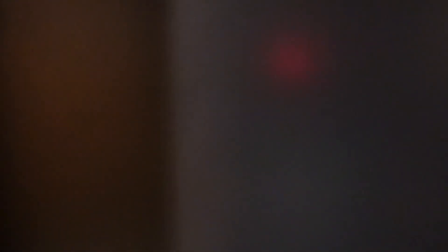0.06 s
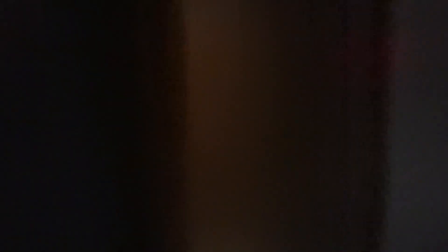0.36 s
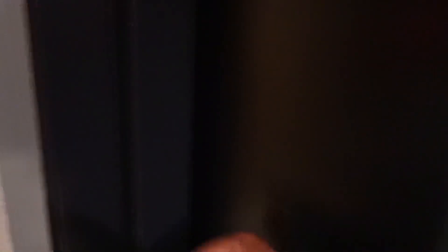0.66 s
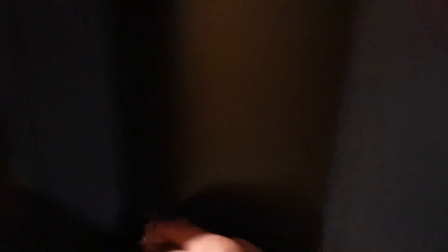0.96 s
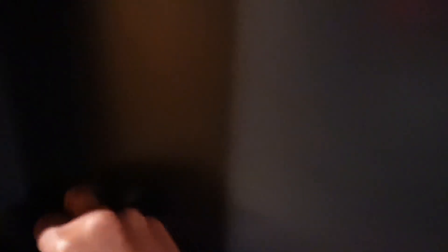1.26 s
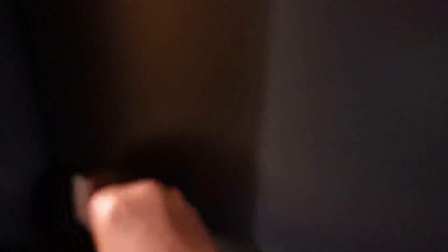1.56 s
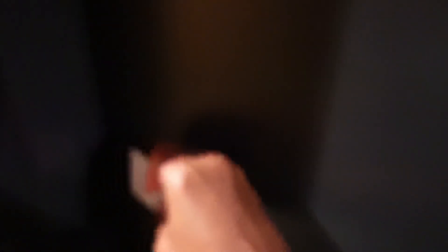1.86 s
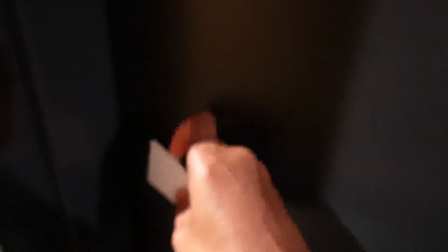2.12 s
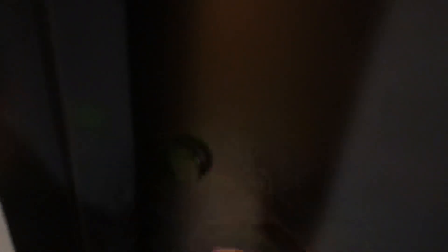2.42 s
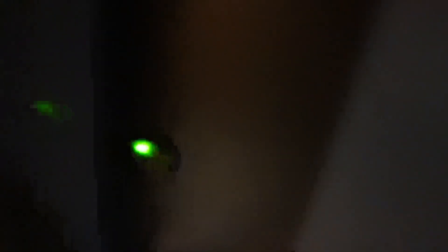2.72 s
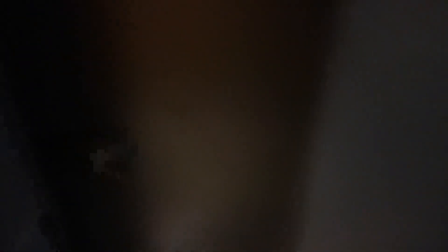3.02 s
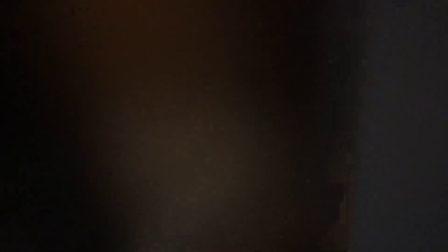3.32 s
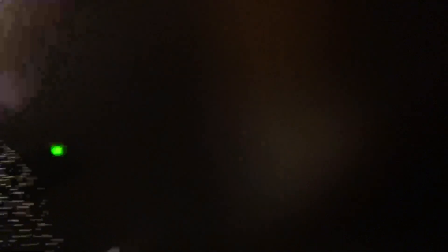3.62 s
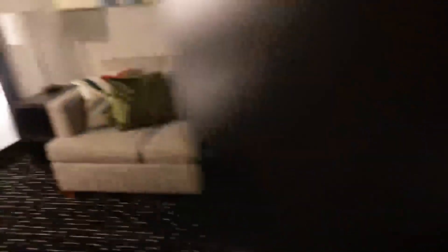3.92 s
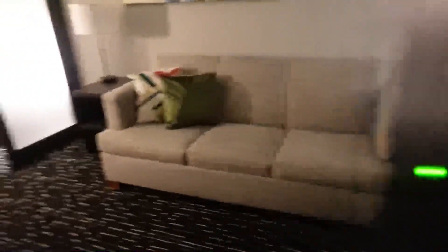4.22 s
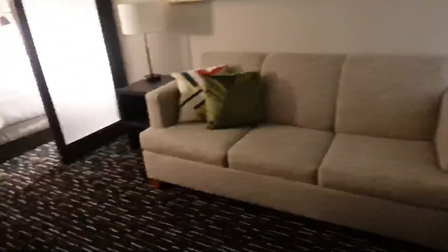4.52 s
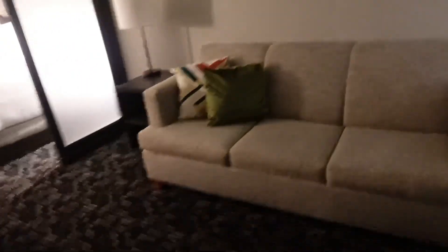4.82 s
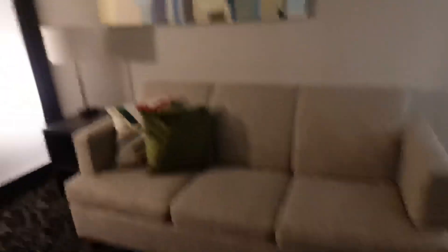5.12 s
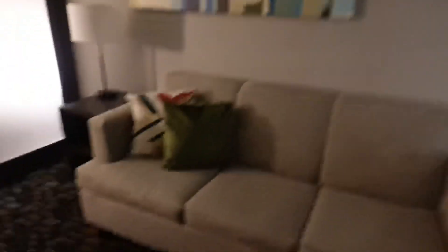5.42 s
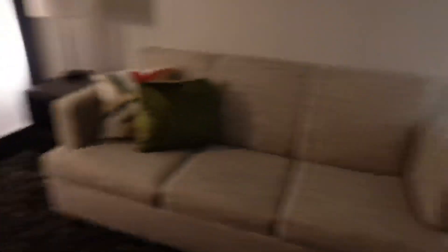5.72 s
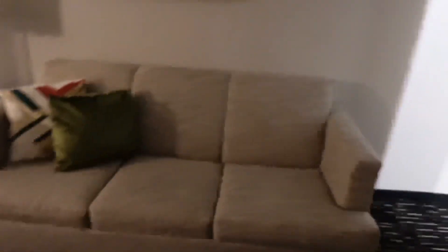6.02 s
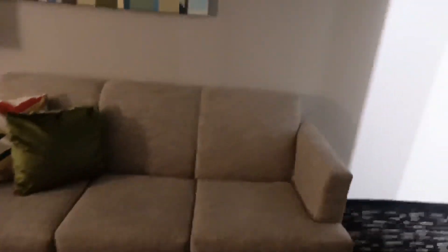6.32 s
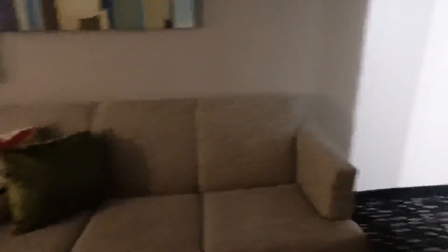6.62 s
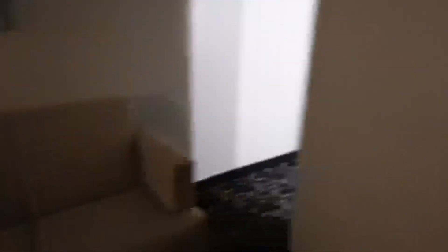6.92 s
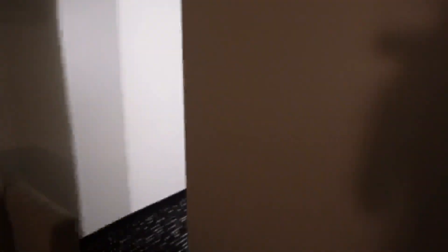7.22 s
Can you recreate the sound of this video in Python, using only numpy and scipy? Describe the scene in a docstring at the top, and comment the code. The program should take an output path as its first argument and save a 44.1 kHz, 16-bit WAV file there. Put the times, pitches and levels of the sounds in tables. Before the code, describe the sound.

Low puffs of wind hit the microphone, followed by close, light clicks and a tiny squeak from a plastic key card. A door handle turns with metallic clacks and a sharp latch snap, and the door sweeps open, fanning rumbling air across the microphone. Faint clothing rustle and ventilation hiss fill a carpeted room as the door knocks closed off to the right and clicks.

```python
"""Someone with a handheld camera opens a key-card door and walks into a carpeted room.
Air buffets the microphone in a quiet corridor. The plastic card clicks and squeaks in the fingers,
then knocks into the lock. The handle grinds round, the latch snaps and the door sweeps over the carpet,
fanning more gusts. Clothes swish as the room's ventilation comes up; behind the walker the door bumps
its frame and the latch drops in."""
import sys
import numpy as np
from scipy import signal
from scipy.fft import rfft, irfft, next_fast_len
from scipy.io import wavfile
from scipy.ndimage import uniform_filter1d

SR = 44100
rng = np.random.default_rng(int(sys.argv[2]) if len(sys.argv) > 2 else 0)


def wrap_up_sound(samples):
    """Save the sound to the file named by the first command line argument, as 16-bit audio."""
    columns = np.atleast_2d(samples).T
    # keep every value between -1 and 1, then stretch to whole-number steps
    tamed = np.clip(columns, -1, 1)
    steps = np.round(tamed * 32767).astype(np.int16)
    wavfile.write(sys.argv[1], SR, steps)


N = 329239
TIME = np.arange(N) / SR

# The room's air comes up as the walker steps in. Each row: time in seconds, level in dB.
ROOM_AIR_FADE = [(0, -66.5), (2.5, -75.5), (3.5, -60), (4.6, -65), (5.0, -58), (5.3, -53.5), (5.7, -51.5),
                 (6.5, -55), (7.47, -54)]


def gain_of(db):
    """Decibels to amplitude."""
    return 10 ** (np.asarray(db) / 20)


def evened(x):
    """Scales to rms 1."""
    return x / np.sqrt(np.mean(x ** 2) + 1e-20)


def read(points, hz):
    """Reads a table on a log-frequency axis."""
    f, value = np.transpose(points)
    return np.interp(np.log(hz + 1), np.log(f + 1), value)


def follow(curve):
    """A fader ride through rows of seconds and dB, silent outside them."""
    s, db = np.transpose(curve)
    return gain_of(np.interp(TIME, s, db, left=-120, right=-120))


def add(mix, s, sound):
    """Mixes a sound in at s seconds."""
    part = mix[..., max(round(s * SR), 0):][..., :sound.shape[-1]]
    part += sound[..., :part.shape[-1]]


def freqs(size):
    """Frequencies of the FFT bins."""
    return np.fft.rfftfreq(size, 1 / SR)


def dying(t, t60):
    """Decay by 60 dB in t60 seconds, 1 ms at the shortest."""
    return np.exp(-np.log(1000) * t / np.maximum(t60, 1e-3))


def coloured(x, spectrum):
    """An EQ drawn through rows of Hz and dB."""
    size = next_fast_len(x.shape[-1])
    return irfft(rfft(x, size) * gain_of(read(spectrum, freqs(size))), size)[..., :x.shape[-1]]


def causal(db):
    """Minimum-phase response with the given gain."""
    log_gain = np.log(gain_of(np.r_[db, db[-2:0:-1]]))
    return np.exp(np.conj(signal.hilbert(log_gain)))[:len(db)]


def panned(pan_db):
    """Gains of the microphone's two ports; pan is left minus right."""
    return gain_of(pan_db * np.array([[.5], [-.5]]))


def diffuse(pair):
    """Spreads a mid and a side signal as wide as diffuse sound is at the two ports."""
    # Each row: frequency in Hz, likeness of left and right from 0 to 1.
    likeness = [(100, 0.95), (500, 0.75), (1500, 0.44), (5000, 0.53), (14000, 1)]
    size = next_fast_len(pair.shape[-1])
    mid, side = rfft(pair, size)
    same = np.clip(read(likeness, freqs(size)), 0, 1)
    mid, side = mid * np.sqrt((1 + same) / 2), side * np.sqrt((1 - same) / 2)
    return irfft(np.array([mid + side, mid - side]), size)[:, :pair.shape[-1]]


def at_ports(x, spread_db, size=220):
    """Hand and door reflect a close sound slightly differently into each port."""
    scatter = rng.standard_normal(size) * np.hanning(size)
    side = gain_of(spread_db) * signal.oaconvolve(x, scatter / np.linalg.norm(scatter))[:N]
    return np.array([x + side, x - side])


def reverb(x, size=32768):
    """The room's diffuse tail, each band dying at its own speed."""
    # Each row: frequency in Hz, t60 in seconds.
    decay_times = [(100, 0.93), (300, 0.45), (1000, 0.43), (3000, 0.47), (7000, 0.5), (15000, 0.36)]
    hz, t, bands = signal.stft(rng.standard_normal((2, size)), SR, nperseg=256)
    swell = 1 - np.exp(-(t / 0.0021) ** 2)
    decay = dying(t, read(decay_times, hz)[:, None])
    tail = diffuse(signal.istft(bands * swell * decay, SR, nperseg=256)[1])
    return signal.oaconvolve(x[None], tail / np.linalg.norm(tail[0]), axes=1)[:, :N]


def air(spectrum, waver_db=0):
    """A wide noise bed whose level can waver in patches of frequency and time."""
    noise = coloured(diffuse(rng.standard_normal((2, N))), spectrum)
    bands = signal.stft(noise, SR, nperseg=512)[2]
    patches = uniform_filter1d(rng.standard_normal(bands.shape[1:]), 9, axis=0)
    patches = evened(uniform_filter1d(patches, 14, axis=1))
    return evened(signal.istft(bands * gain_of(waver_db * patches), SR, nperseg=512)[1][:, :N])


def corridor_air():
    """Quiet ventilation and a low drone that fades as the walker stops."""
    # Each row: frequency in Hz, relative level in dB.
    vent_eq = [(18, -63.5), (30, -45), (124, 4), (844, -13), (962, -11.5), (1070, -15), (3310, -18.5),
               (4190, -13.5), (4530, -26), (5040, -8.5), (5590, -14), (8980, -29), (9710, -25),
               (12600, -21), (16000, -35.5)]
    drone_eq = [(100, -29.5), (190, -5.5), (255, 3.5), (330, -16), (600, -66)]
    # Each row: time in seconds, level in dB.
    drone_fade = [(0.4, -43), (0.7, -55), (1.05, -56), (1.7, -74)]
    return gain_of(-69.5) * air(vent_eq) + follow(drone_fade) * air(drone_eq, waver_db=5)


def room_air():
    """The room's louder ventilation, with a thin whine on top."""
    # Each row: frequency in Hz, relative level in dB.
    vent_eq = [(18, -54), (30, -22), (87, -12), (145, 1), (203, -0.5), (257, -5), (503, -13.5),
               (668, -16.5), (1180, -15), (1490, -18.5), (2370, -19.5), (5150, -26.5), (6500, -26),
               (14500, -37.5)]
    whine_eq = [(13000, -41.5), (15000, -14), (15500, -15), (15900, 2), (16400, -25)]
    bed = air(vent_eq, waver_db=1.43) + gain_of(-17) * air(whine_eq, waver_db=-1)
    return follow(ROOM_AIR_FADE) * bed


def fine_hiss(attack_s=0.07, release_t60=0.68):
    """Air hisses in swells, strongest as the door swings; a trace stays on in the room."""
    # Each row: frequency in Hz, relative level in dB.
    hiss_eq = [(3000, -13.5), (4500, -7), (5400, 0.5), (6800, -7.5), (9000, -5.5), (11000, -3.5),
               (14000, 0.5), (16000, -2)]
    # Each row: start in seconds, length in seconds, level in dB.
    cues = [(-0.05, 0.35, -65.5), (1.6, 0.13, -74), (3.851, 0.28, -55.5), (4.365, 0.46, -60)]
    swells = np.zeros(N)
    for s, length, db in cues:
        attack = np.clip((TIME - s) / attack_s, 0, 1) ** 2
        swells += gain_of(db) * attack * dying(np.maximum(TIME - s - length, 0), release_t60)
    fade_in = np.clip(TIME - cues[-1][0], 0, 1)  # from the last swell on
    steady = gain_of(-15) * follow(ROOM_AIR_FADE) * fade_in
    return np.hypot(swells, steady) * air(hiss_eq)


def eddy(s, peak_db, hz, pan_db, half_width_cycles=0.58):
    """One eddy pops on the microphone, out of step between the ports. Returns start and sound."""
    t, turn = np.arange(-SR // 50, SR // 50) / SR, rng.random(2)
    cycles = hz * t + turn[0] + 0.19 * np.array([[0], [1]]) * turn[1]
    puff = np.cos(2 * np.pi * cycles) / (1 + (t * hz / half_width_cycles) ** 2) ** 2
    return s + t[0], gain_of(peak_db) * panned(pan_db) * puff


def wind(flutter_db=1.1, eddies_per_s=21):
    """Turbulence as the camera swings and the door fans the air, reaching higher as it grows."""
    # Each row: peak time in seconds, relative level in dB, time to build by 60 dB in seconds
    # (negative for a hard onset), t60 in seconds, pan in dB.
    gusts = [(0.0, -33, .1, 0.2, -1), (0.189, -28.5, 0.1, 0.079, 13.5), (0.246, -23, 0.23, 0.2, 2),
             (0.281, -23, 0.12, 0.32, -7), (0.383, -26.5, 0.4, 0.42, -0.5), (0.8, -49.5, -0.34, 0.24, 3),
             (1.29, -66, 4.5, 0.39, -1), (2.15, -59.5, 0.4, .7, 0), (3.836, -35, 0.55, 0.49, -11.5),
             (3.92, -43, -0.2, 0.66, 11), (4.033, -37, 1.1, 0.4, 2), (4.344, -20, 0.16, 0.071, 4),
             (4.45, -24, 0.71, 0.057, -0.5), (4.575, -42, 0.5, 0.29, 4.5), (4.744, -44, 0.3, 0.27, -2),
             (4.835, -43, 0.2, 0.13, -3.5), (4.877, -40.5, -1.65, 0.071, -5), (5.049, -48, 0.2, 0.51, 14)]
    # Gentle and strong flow. Each row: frequency in Hz, relative level in dB.
    breeze_eq = [(20, -30.5), (50, -23), (95, 7.5), (150, 4), (240, -3.5), (350, -19.5), (500, -35.5),
                 (800, -57), (1500, -56.5), (4000, -67)]
    gust_eq = [(20, -47), (50, -23), (95, -16.5), (150, 3), (270, 6.5), (380, -11.5), (550, -15),
               (800, -34), (1500, -69), (4000, -56.5)]
    # Each row: time in seconds, peak in dB, pitch in Hz, pan in dB.
    hard_eddies = [(0.243, -18, 305, -16), (0.346, -20.5, 264, -22.5), (0.378, -12, 242, -9),
                   (3.712, -36, 166, -11), (3.768, -32, 251, -15), (3.835, -21, 238, -12),
                   (3.924, -22, 193, -2), (4.028, -21, 146, 5), (4.248, -24, 144, -9.5),
                   (4.289, -17, 243, -2), (4.337, -15.5, 127, -8), (4.349, -12.5, 222, 1),
                   (4.424, -21, 335, -4), (4.446, -16.5, 250, 10)]
    power = np.zeros((2, N))
    for s, db, build, fall, pan_db in gusts:
        swell = dying(abs(TIME - s), np.where(TIME < s, build, fall))
        power += (gain_of(db) * panned(pan_db) * swell) ** 2
    envelope = np.sqrt(power)
    level = envelope.mean(0) + 1e-9
    strength = level / (level + gain_of(-32.5))
    noise = rng.standard_normal((2, N))
    noise = noise + 0.91 * (1 - strength) ** 4 * noise[::-1]  # gentle air is nearly mono
    flow = (1 - strength) * evened(coloured(noise, breeze_eq))
    flow += strength * evened(coloured(noise, gust_eq))
    flow /= np.sqrt(uniform_filter1d(flow ** 2, 1100, axis=1) + 1e-4)  # ride the level flat
    flutter = gain_of(flutter_db * evened(uniform_filter1d(rng.standard_normal(N), 900)))
    out = gain_of(-2) * envelope * flow * flutter
    for row in hard_eddies:
        add(out, *eddy(*row))
    for at in np.flatnonzero(rng.random(N) < eddies_per_s / SR):  # lesser eddies ride the gusts
        peak_db = 20 * np.log10(level[at]) + 4
        hz = 263 * 2 ** (0.02 * (peak_db + 21))  # stronger ones turn faster
        add(out, *eddy(at / SR, peak_db, hz, pan_db=11 * rng.uniform(-0.91, 1)))
    return out


def friction(strokes, rise, octaves, skirt, grain_db, size=32768):
    """Grainy noise strokes that swell, then die. Rise is a share of t60; skirt steepens the band."""
    t, hz, out = np.arange(size) / SR, freqs(size), np.zeros((2, N))
    for s, level_db, t60, centre_hz in strokes:
        noise = rng.standard_normal((3, size))
        rise_s = rise * t60
        late = t - min(3 * rise_s, s)
        swell = np.where(late < 0, np.exp(-(late / rise_s) ** 2), dying(np.maximum(late, 0), t60))
        grains = gain_of(grain_db * evened(uniform_filter1d(noise[2], 90)))
        band = 1 / (1 + (np.log2((hz + 1) / centre_hz) / octaves) ** 2) ** skirt
        band /= 1 + (90 / (hz + 1)) ** 2  # low cut
        mid, side = evened(irfft(rfft(noise[:2] * grains) * band))
        add(out, s + late[0], gain_of(level_db) * swell * (mid + 0.23 * np.array([side, -side])))
    return out


def clothes_swish(centre_hz=2450):
    """Cloth brushes cloth with the steps."""
    # Each row: peak time in seconds, level in dB, t60 in seconds.
    swishes = [(4.739, -62, 0.25), (4.856, -55, 0.45), (5.039, -56.5, 0.11), (5.139, -55.5, 0.35),
               (6.084, -53.5, .1), (6.249, -52.5, 0.26), (6.987, -51.5, 0.39)]
    strokes = [(*row, centre_hz) for row in swishes]
    return friction(strokes, rise=0.11, octaves=1.7, skirt=1.24, grain_db=2.5)


def grip_rustle():
    """Fingers shift on the camera."""
    # Each row: peak time in seconds, level in dB, t60 in seconds, band centre in Hz.
    strokes = [(0.01, -58.5, 0.3, 885), (0.179, -48, .11, 1180), (0.226, -43, 0.13, 1120),
               (0.242, -48, .045, 6000), (0.377, -61, 0.052, 1390), (4.982, -55, 0.051, 4970),
               (6.532, -58, .06, 2480)]
    return friction(strokes, rise=0.059, octaves=1.18, skirt=1.16, grain_db=4)


def card_slide():
    """The card slides on skin and along the lock."""
    # Each row: peak time in seconds, level in dB, t60 in seconds, band centre in Hz.
    strokes = [(0.793, -48, 0.27, 3040), (0.923, -38, 0.15, 3070), (1.004, -41, 0.24, 2600),
               (1.049, -47, 0.093, 1890), (1.186, -50, .22, 3270), (1.299, -53, .35, 1140),
               (1.449, -56, .4, 1030), (2.072, -57, 0.31, 3660), (2.356, -54.5, 0.37, 2360)]
    return friction(strokes, rise=0.092, octaves=0.94, skirt=1.3, grain_db=3.5)


def handle_grind(panel_s=2.665, panel_db=-41.5, panel_t60=1, panel_hz=118):
    """The pressed handle grinds on its spindle and the door panel rumbles under it."""
    # Each row: peak time in seconds, level in dB, t60 in seconds, band centre in Hz.
    strokes = [(2.664, -42, 0.2, 744), (2.713, -40, 0.26, 740), (2.832, -42.5, 0.12, 1190),
               (2.849, -34, .09, 310), (2.946, -52.5, .18, 935)]
    spindle = friction(strokes, rise=0.1, octaves=1.8, skirt=2.1, grain_db=3.5)
    rumble = [(panel_s, panel_db, panel_t60, panel_hz)]
    return spindle + friction(rumble, rise=0.012, octaves=0.91, skirt=1.25, grain_db=0)


def door_sweep():
    """The door brushes its seal and the carpet, opening and closing."""
    # Each row: peak time in seconds, level in dB, t60 in seconds, band centre in Hz.
    strokes = [(3.193, -43.5, .37, 2150), (3.511, -48.5, 0.44, 2880), (3.632, -53, 0.28, 2500),
               (5.35, -51, 0.39, 1260), (5.417, -37, 0.15, 1600), (5.718, -52.5, 1.3, 1000),
               (5.843, -42, 0.47, 1470), (5.892, -43.5, 0.27, 2180)]
    return friction(strokes, rise=0.065, octaves=1.35, skirt=1.18, grain_db=1)


def hit(row, body_eq, modes, modes_db, snap_db, size=16384):
    """A sharp contact and its dense chatter pass through the body of the struck thing, which rings."""
    level_db, bright, thud_db, t60, spot_hz, spot_db = row
    t, hz = np.arange(size) / SR, freqs(size)
    grit = rng.standard_normal((2, size))
    snap = rfft(evened(grit[0] * dying(t, 0.0035)))
    slow, quick = (rfft(evened(grit[1] * dying(t, life))) for life in (t60, t60 * 0.47))
    treble = 1 / (1 + (4500 / (hz + 1)) ** 2)  # the treble of the chatter dies first
    contact = gain_of(snap_db) * snap + (1 - treble) * slow + treble * quick
    body = irfft(causal(read(body_eq, hz)))
    ring = sum(gain_of(db) * dying(t, life) * np.sin(2 * np.pi * f * t) for f, db, life in modes)
    ring *= dying(t, 0.16 + 8 * t60)  # damping: short contacts ring for less time
    struck = evened(irfft(contact * rfft(body))) + gain_of(modes_db) * evened(ring)
    # A hard contact is bright; a heavy one also shakes the whole panel.
    tilt_db = bright * np.log2(np.maximum(hz, 500) / 2000) + thud_db / (1 + (hz / 400) ** 3)
    # Each spot of contact favours one resonance.
    favoured_db = spot_db / (1 + ((hz / spot_hz - 1) / 0.076) ** 2)
    spectrum = rfft(struck) * causal(tilt_db + favoured_db)
    attack = irfft(spectrum * (hz > 450))[:265]  # the first 6 ms, less the bass, set the level
    return gain_of(level_db) * irfft(spectrum) / np.std(attack)


def close_hits(hits, body_eq, modes, modes_db, snap_db, spot_db, thud_db=0):
    """All hits on one object within arm's reach; a row may add a thud of its own."""
    out = np.zeros(N)
    for s, level_db, bright, t60, spot_hz, *own_thud in hits:
        row = level_db, bright, thud_db + sum(own_thud), t60, spot_hz, spot_db
        add(out, s, hit(row, body_eq, modes, modes_db, snap_db, size=8192))
    return out


def card_squeak(peak_s=1.058, level_db=-28, hz=4340, rise_s=0.004, t60=0.06):
    """The card's edge sticks and slips in a brief, rough tone."""
    late = TIME - peak_s
    swell = np.where(late < 0, np.exp(-(late / rise_s) ** 2), dying(np.maximum(late, 0), t60))
    waver = 1 + 0.0193 * evened(uniform_filter1d(rng.standard_normal(N), 30))
    return gain_of(level_db) * swell * np.sqrt(2) * np.sin(2 * np.pi * np.cumsum(hz * waver) / SR)


def card_clicks():
    """The plastic card is flicked and turned in the fingers."""
    # Each row: start in seconds, level in dB, tilt in dB per octave, chatter t60 in seconds,
    # spot resonance in Hz.
    clicks = [(0.7368, -42, 2.5, 0.055, 2000), (0.7765, -41, -5, 0.023, 2120),
              (0.7863, -24, 1, 0.028, 4500), (0.7925, -35, 3, 0.063, 4600), (0.9188, -39, 4, 0.037, 3050),
              (0.9305, -40, -1.5, 0.24, 1970), (0.9921, -35, -3.5, 0.059, 3200),
              (1.0213, -30.5, 3.5, 0.058, 1860), (1.03, -32.5, 0, 0.077, 3100),
              (1.0488, -32, 1, 0.036, 3530), (1.0563, -27, 3, 0.051, 4350), (1.1006, -28, 1, 0.045, 2840),
              (1.1375, -40.6, 1, 0.018, 6700), (1.165, -36, -0.3, 0.062, 5370),
              (1.4693, -37, -3, 0.081, 1135)]
    # Each row: frequency in Hz, gain in dB.
    body_eq = [(40, -12), (120.0, -22.5), (250.0, 5), (450.0, -18), (800.0, -7), (1200.0, -2.5),
               (1900.0, 2.5), (3000.0, -2.5), (4400.0, -0.5), (6500.0, -7), (9000.0, -8.5),
               (12000.0, -12.5), (15500.0, -16)]
    # Each row: pitch in Hz, relative level in dB, t60 in seconds before damping.
    modes = [(1502, -5.5, 0.069), (1933, -7.5, 0.1), (2855, -2, 0.024), (3970, -19, 0.031),
             (6600, -19, 0.053), (6370, -10, 0.1)]
    return close_hits(clicks, body_eq, modes, modes_db=-8.5, snap_db=-11, spot_db=10.5, thud_db=-9)


def slot_clicks():
    """The card knocks about in the slot of the lock."""
    # Each row: start in seconds, level in dB, tilt in dB per octave, chatter t60 in seconds,
    # spot resonance in Hz.
    clicks = [(2.137, -42.5, 2, .051, 5700), (2.238, -34, -0.1, 0.031, 3200),
              (2.291, -31.5, 3.5, 0.038, 2410), (2.325, -41.5, -2, 0.051, 4240),
              (2.388, -41, 2.5, 0.013, 1336), (2.456, -42, 2.5, 0.038, 8100)]
    # Each row: frequency in Hz, gain in dB.
    body_eq = [(40, -54), (120.0, -4), (250.0, 4), (450.0, -40), (800.0, -3), (1200.0, -6.5),
               (1900.0, -8.5), (3000.0, -7.5), (4400.0, -3), (6500.0, -15.5), (9000.0, -19), (12000.0, -20),
               (15500.0, -24)]
    # Each row: pitch in Hz, relative level in dB, t60 in seconds before damping.
    modes = [(817, -12.5, 0.21), (1434, -12, 0.14), (2436, -10, 0.037), (3260, -1, 0.03),
             (4500, -16, 0.038), (5840, -5, 0.032), (11370, -22, 0.067)]
    return close_hits(clicks, body_eq, modes, modes_db=-7, snap_db=-38, spot_db=9.5, thud_db=-12)


def latch_clacks():
    """Handle and latch bolt clack and ring close by; the row 28 ms after the snap is its echo off a nearby
    surface."""
    # Each row: start in seconds, level in dB, tilt in dB per octave, chatter t60 in seconds,
    # spot resonance in Hz, thud in dB.
    clacks = [(2.6405, -41.5, -4.5, .027, 1650, 13), (2.6518, -29.5, 1.8, 0.099, 428, 7),
              (2.7458, -40.5, 5, 0.051, 480, 18), (2.8395, -34, 3.2, 0.033, 437, 22),
              (2.9925, -40.5, -2, 0.11, 600, 4), (2.999, -30.5, 1, 0.12, 1270, 15),
              (3.0563, -19, -0.3, 0.035, 7140, -11), (3.061, -25.5, -1, 0.11, 520, -6.5),
              (3.0848, -29, -3.5, .12, 1840, -3), (3.3657, -56, 1, 0.08, 437, 28),
              (3.4548, -46, 0, .094, 5840, 7), (3.8075, -43, 0.8, .097, 454, 0)]
    # Each row: frequency in Hz, gain in dB.
    body_eq = [(40, -47), (120.0, -12), (250.0, -8.5), (450.0, -2), (800.0, -4), (1200.0, -3),
               (1900.0, -3.5), (3000.0, -11), (4400.0, -10.5), (6500.0, -11.5), (9000.0, -17.5),
               (12000.0, -20.5), (15500.0, -28)]
    # Each row: pitch in Hz, relative level in dB, t60 in seconds before damping.
    modes = [(523, -2, 0.1), (606, -2.5, 0.46), (890, 1.5, 0.19), (1100, 3, 0.16), (1360, 9.5, 0.085),
             (1823, -4, 0.15), (2077, 1, 0.2), (2970, 1, 0.14), (5360, 6, 0.049), (5730, 1, 0.089),
             (6870, 8, 0.029), (7700, -12, 0.065)]
    return close_hits(clacks, body_eq, modes, modes_db=-6, snap_db=-30, spot_db=11.5)


def door_shut(spot_db=7):
    """The door bumps its frame some steps off to the right; the bolt rings the strike plate."""
    # Each row: start in seconds, relative level in dB, tilt in dB per octave, chatter t60 in seconds,
    # spot resonance in Hz, thud in dB, reverb send in dB.
    knocks = [(5.3638, -38, -2.5, 0.37, 3040, -12, 8), (5.3903, -23, -3.1, 0.18, 1166, -9.5, -12),
              (5.399, -27, 2, 0.42, 1010, 1, -19), (5.411, -22.5, -0.1, 0.33, 504, 9, -14),
              (5.4466, -27, 2.5, 0.034, 724, 10, 0), (5.8186, -36.5, 2, 0.059, 3230, 2.5, 4),
              (5.8646, -30, 4, 0.063, 5730, 13.5, .5), (5.9401, -32, 2.5, 0.027, 3630, -9, -5),
              (7.2889, -44.5, -.5, 0.02, 3820, -3, -0.5)]
    # Each row: frequency in Hz, gain in dB.
    body_eq = [(40, -34), (120.0, -2.5), (250.0, 0.5), (450.0, -2), (800.0, -1), (1200.0, 0),
               (1900.0, -3.5), (3000.0, -6), (4400.0, -6.5), (6500.0, -11), (9000.0, -14), (12000.0, -17.5),
               (15500.0, -19)]
    # Each row: pitch in Hz, relative level in dB, t60 in seconds before damping.
    modes = [(290.5, 1.5, 0.25), (387.5, 3, 0.34), (512, 2.5, 0.22), (669, 1, 0.31), (970, -19, 0.28),
             (1140, -17, 0.11), (1440, -36, 0.27), (1640, -16, 0.17), (1670, 9, 0.075), (3750, -9, .2)]
    # Each row: start in seconds, relative level in dB, pitch in Hz, t60 in seconds.
    strike_plate = [(5.94, -40, 683, 0.32), (5.94, -49, 3600, 0.13), (5.94, -46, 3640, .12)]
    # Each row: frequency in Hz, pan in dB.
    pan_curve = [(150, 0), (500, -1.5), (1500, -7.5), (5000, -3.5), (12000, -2)]
    mid_side, send = np.zeros((2, N)), np.zeros(N)
    for s, level_db, bright, t60, spot_hz, thud_db, send_db in knocks:
        row = level_db, bright, thud_db, t60, spot_hz, spot_db
        knock = hit(row, body_eq, modes, modes_db=-8, snap_db=-13.5)
        side_knock = hit(row, body_eq, modes, modes_db=-49, snap_db=1)
        add(mid_side, s, np.array([knock, side_knock]))
        add(send, s, knock * gain_of(send_db))
    t = np.arange(SR) / SR
    for s, level_db, hz, t60 in strike_plate:
        add(mid_side[0], s, gain_of(level_db) * dying(t, t60) * np.sin(2 * np.pi * hz * t))
    left, right = diffuse(mid_side) + gain_of(-0.5) * reverb(send)
    pan = np.array(pan_curve)
    return np.array([coloured(left, pan * [1, .5]), coloured(right, pan * [1, -.5])])


def scene():
    """Card and lock up close, the door farther off, air all round."""
    card = card_clicks() + card_squeak()
    slot = slot_clicks()
    latch = latch_clacks()
    tail = reverb(gain_of(-17.5) * card + gain_of(-12.5) * slot + gain_of(-14.5) * latch)
    close = at_ports(card + slot + latch, spread_db=-16.5)
    rubs = grip_rustle() + card_slide() + handle_grind() + door_sweep() + clothes_swish()
    return close + tail + rubs + door_shut() + room_air() + corridor_air() + fine_hiss() + wind()


def record(dry, low_cut_hz=66, high_cut_hz=16150):
    """The camera's bass roll-off and band limit."""
    thin = signal.sosfilt(signal.butter(2, low_cut_hz, "high", fs=SR, output="sos"), dry)
    high_cut = signal.firwin(255, high_cut_hz, window=("kaiser", 8), fs=SR)
    return signal.oaconvolve(thin, high_cut[None], "same")


dry = scene()
out = record(dry)
wrap_up_sound(out)
```